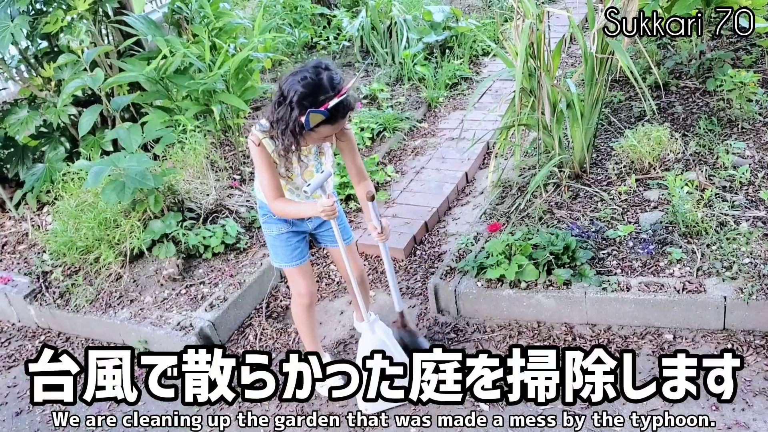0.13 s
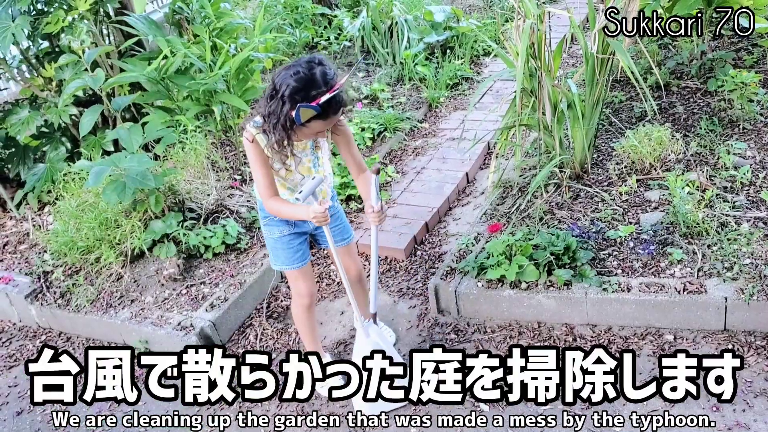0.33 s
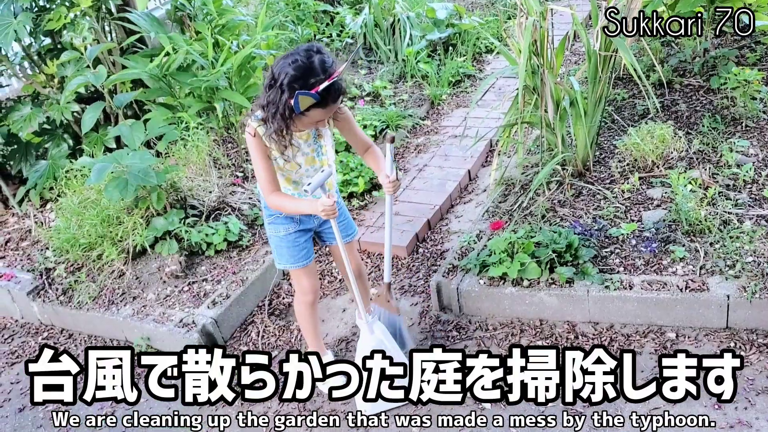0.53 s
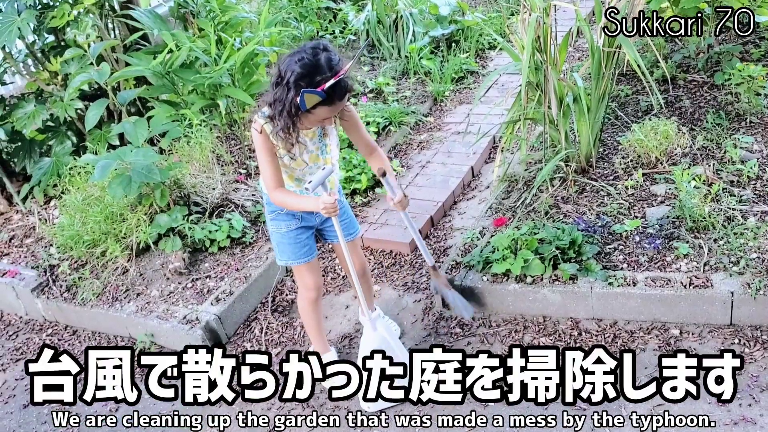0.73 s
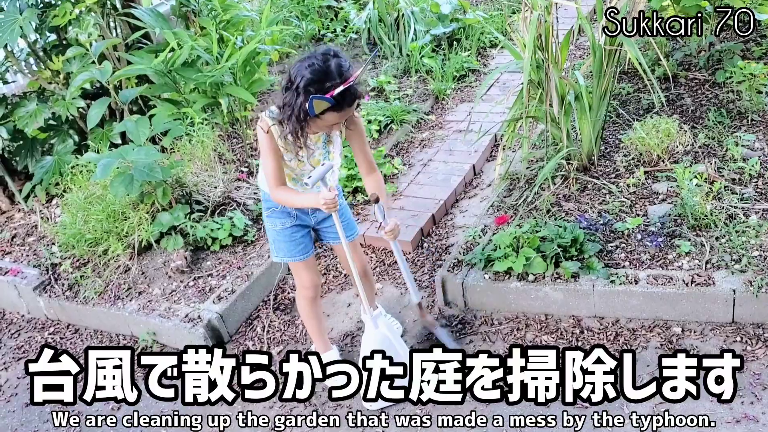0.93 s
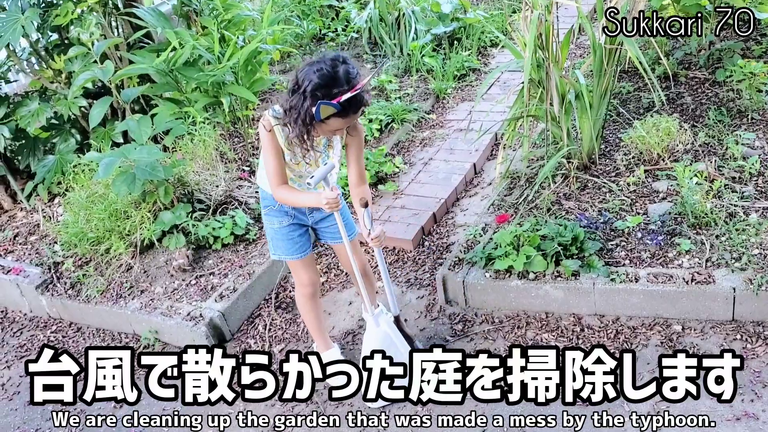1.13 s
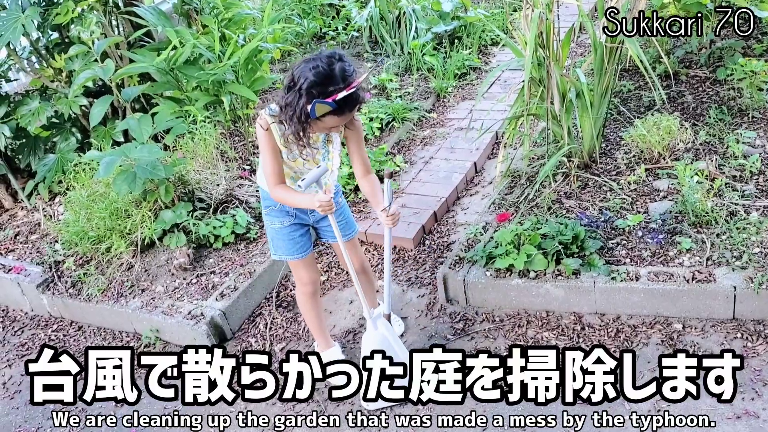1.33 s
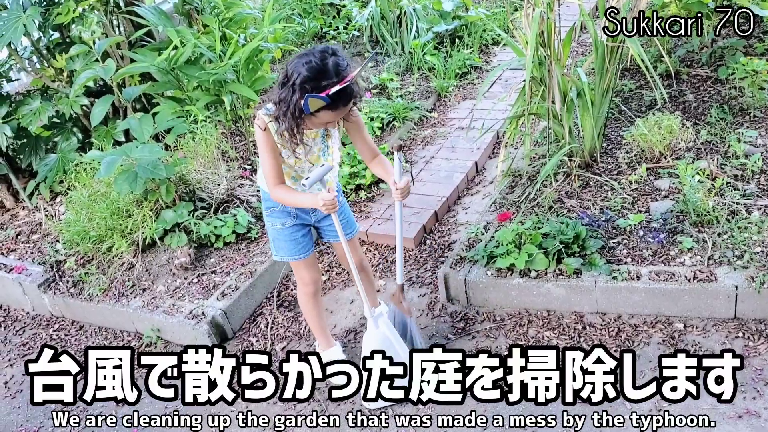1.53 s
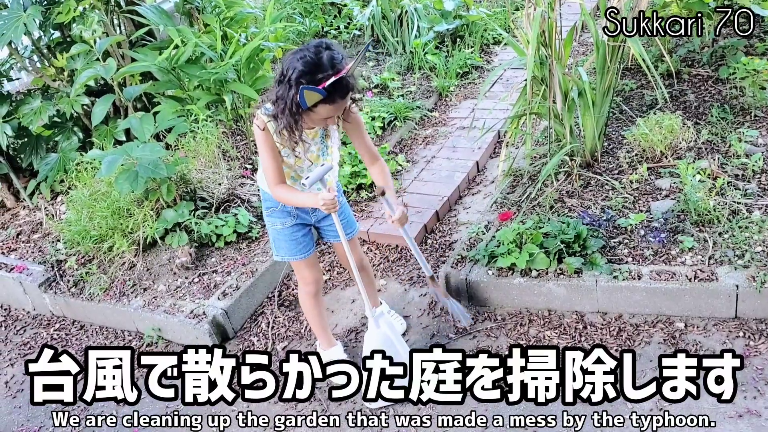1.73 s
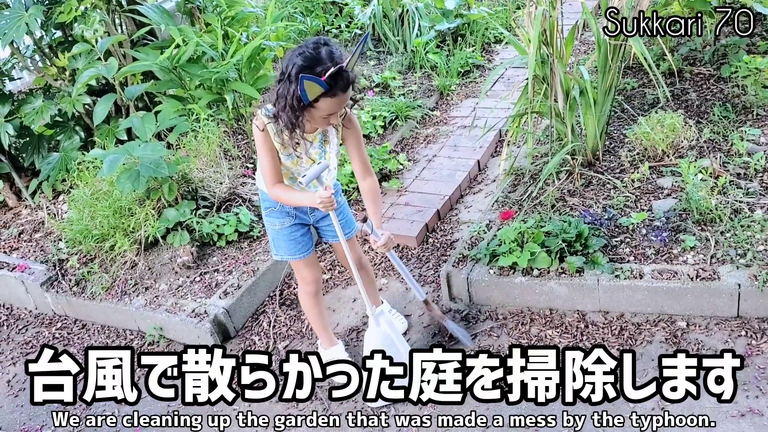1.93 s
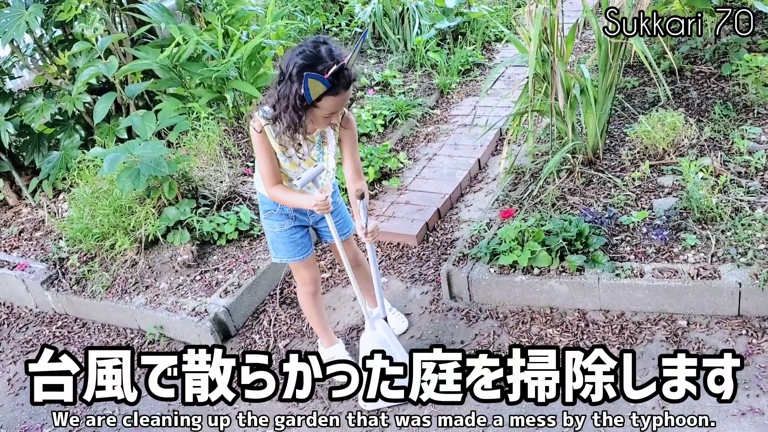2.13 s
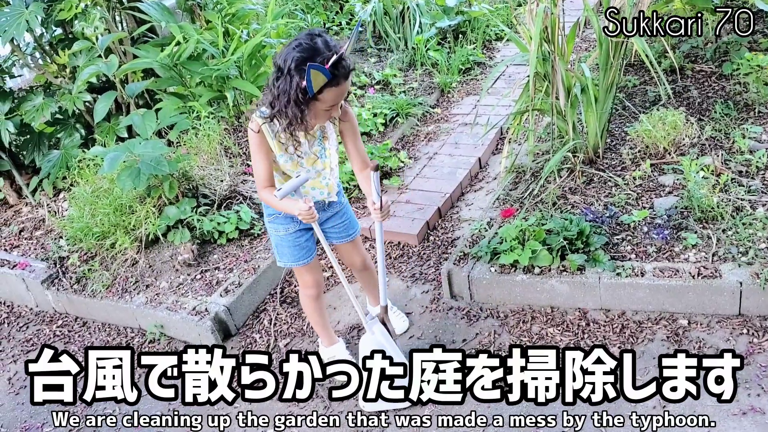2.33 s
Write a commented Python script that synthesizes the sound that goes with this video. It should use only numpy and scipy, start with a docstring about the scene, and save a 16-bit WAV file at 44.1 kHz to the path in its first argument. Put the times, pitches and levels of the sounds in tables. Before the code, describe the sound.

Close up in a garden, bristles scrape leaves and grit, then the broom head knocks a plastic pan; this happens three times, the last loudest, with light scuffs and grit clicks between and faint low rumble behind.

```python
"""A small broom sweeps dry leaves and grit over a dirt path into a hollow plastic dustpan, three strokes.
The bristles are hissing noise plus tiny crackling pings; light touches and clicks of grit come between.
Litter is noise that rushes onto the pan; knocks of the broom head are a crack plus ringing tones.
The walls answer faintly; under it all lie a soft rumble and the wavering hum of a distant machine."""
import sys
import numpy as np
from scipy import signal
from scipy.fft import rfft, irfft, next_fast_len
from scipy.io import wavfile
from scipy.ndimage import map_coordinates

SR = 44100
rng = np.random.default_rng(int(sys.argv[2]) if len(sys.argv) > 2 else 0)


def unload_wav(signal):
    """Save mono or channel-first audio to the path in sys.argv[1] as 16-bit WAV at rate SR, clipped to [-1, 1]."""
    wavfile.write(
        sys.argv[1],
        SR,
        np.round(np.clip(np.atleast_2d(signal).T, -1, 1) * 32767).astype(np.int16),
    )


N = 105531  # length in samples
TOP_HZ = 15750  # nothing sounds above this


def amp(db):
    """Turn decibels into gain."""
    return 10 ** (np.asarray(db) / 20)


def unit(x):
    """Scale x to an rms (average strength) of 1."""
    return x / np.sqrt(np.mean(x ** 2) + 1e-20)


def along(points, hz):
    """Read a curve of (Hz, value) points at hz, on a log frequency axis."""
    point_hz, values = np.transpose(points)
    return np.interp(np.log(hz + 1), np.log(point_hz + 1), values)


def since(s):
    """Seconds since time s, zero before it."""
    return np.maximum(np.arange(N) / SR - s, 0)


def fade(t, t60):
    """Gain that falls 60 dB in t60."""
    return np.exp(-np.log(1000) * t / t60)


def wobble(rate):
    """A smooth random curve with rate knots a second."""
    knots = rng.standard_normal(N // 20)
    return map_coordinates(knots, [np.arange(N) * rate / SR], mode="wrap")


def filtered(x, response):
    """Filter x by a response given as a function of frequency."""
    size = next_fast_len(N + SR // 2)
    hz = np.fft.rfftfreq(size, 1 / SR)
    return irfft(rfft(x, size) * response(hz), size)[..., :N]


def noise(spectrum, alike, grain_db=0):
    """Stereo noise of rms 1; grain_db scatters the sizes of its tiny contacts."""
    pair = rng.standard_normal((2, N)) * amp(grain_db * wobble(1500))

    def color(hz):
        # The balance of mid and side sets how alike the two ears are.
        turn = np.arccos(np.clip(along(alike, hz), -1, 1)) / 2
        return amp(along(spectrum, hz)) * [np.cos(turn), np.sin(turn)]

    mid, side = filtered(pair, color)
    return unit(np.array([mid + side, mid - side]))


# Push of the broom, one list per stroke. Each row: time in seconds, hiss level in dB before a shared lift.
STROKES = [
    [(0.03, -55), (0.088, -44), (0.164, -34.5), (0.218, -36.5), (0.24, -32), (0.296, -32), (0.376, -46.5),
     (0.478, -53), (0.498, -66), (0.532, -65), (0.54, -61)],
    [(0.955, -73), (0.973, -31), (1.023, -28.5), (1.115, -38.5), (1.273, -29), (1.319, -40), (1.335, -34.5),
     (1.425, -50), (1.609, -55.5), (1.667, -87), (1.68, -47)],
    [(1.88, -66), (1.902, -45), (1.95, -34.5), (2.008, -27), (2.07, -32), (2.136, -25.5), (2.39, -58.5)],
]
# Tone color of the bristle hiss. Each row: frequency in Hz, level in dB.
BRISTLES = [(200, -46), (900, -27.5), (1600, -22.5), (2400, -13), (3900, -10.5), (4900, -14.5),
            (7600, -8.5), (8900, 0), (10000, -4), (11300, 1.5), (13200, -4.5), (15700, -6)]
# How alike the broom sounds in both ears. Each row: frequency in Hz, likeness (1 is identical).
BRISTLE_ALIKE = [(500, .4), (3000, 0.4), (12000, 0.083)]
BRISTLE_LEAD_S = 0.000288  # the left ear hears the bristles this much earlier
CRACKLE_DB = -13.5  # crackle against hiss


def bristles():
    """Countless bristle tips flick over dirt and leaves; hiss and crackle follow the push of each stroke."""
    t = np.arange(N) / SR
    push = np.zeros(N)
    for stroke in STROKES:
        s, db = np.transpose(stroke)
        outside = np.maximum(s[0] - t, 0) + since(s[-1])  # seconds before or after the stroke
        push += amp(np.interp(t, s, db)) * fade(outside, 0.19)
    texture = noise(BRISTLES, BRISTLE_ALIKE, grain_db=1.4) + amp(CRACKLE_DB) * crackle()
    hiss = push * amp(3.0 + 0.64 * wobble(70)) * texture  # 3 dB lift and a small flutter
    ears = np.array([[1], [-1]])
    return filtered(hiss, lambda hz: np.exp(1j * np.pi * hz * BRISTLE_LEAD_S * ears))


CRACKLES_PER_S = 3000
CRACKLE_HZ, CRACKLE_OCTAVES = 8270, 2.17  # middle pitch, full spread before the cap at TOP_HZ
CRACKLE_CYCLES, CRACKLE_RANGE_DB = 7.4, 16.5  # cycles to fall 60 dB, loudest to softest


def crackle():
    """Dry leaf edges snap: tiny pings of random pitch and size, rms 1."""
    when, pitch, size, side = rng.uniform(size=(int(CRACKLES_PER_S * N / SR), 4)).T
    hz = np.minimum(CRACKLE_HZ * 2 ** (CRACKLE_OCTAVES * (pitch - .5)), TOP_HZ)[:, None]
    k = np.arange(96)  # samples in each ping
    cycles = hz * k / SR
    levels = amp(-CRACKLE_RANGE_DB * np.sqrt(size))[:, None]
    pings = levels * np.sin(2 * np.pi * cycles) * fade(cycles, CRACKLE_CYCLES)
    at = ((when * N).astype(int)[:, None] + k).ravel()
    ears = []
    for gain in (np.cos(np.pi * side), np.sin(np.pi * side)):
        ears.append(np.bincount(at, (pings * gain[:, None]).ravel(), N)[:N])
    return unit(np.array(ears))


# Light touches of the broom. Each row: start in seconds, length in seconds before it dies away,
# level of the bristles on dirt in dB, level of the leaves in dB.
TOUCHES = [(0.519, 0.036, -78, -55.5), (0.624, .02, -56, -57), (0.775, 0.025, -36, -46.5),
           (0.799, .04, -39.5, -41.5), (0.859, 0.0095, -41, -66), (0.896, 0.091, -51, -55),
           (1.482, 0.18, -68, -56), (1.676, 0.014, -63, -70), (1.728, 0.009, -45, -78),
           (1.814, 0.048, -49.5, -47.5)]
# Tone color of bristles on dirt. Each row: frequency in Hz, level in dB.
DIRT = [(200, -34), (2000, -30.5), (4200, -10), (6000, -11.5), (7500, -6), (9000, 0.5), (11500, 0),
        (13000, -5), (16000, -4)]
# Tone color of the leaves. Each row: frequency in Hz, level in dB.
LEAVES = [(200, -27), (700, -15), (1200, -2), (1650, -6.5), (2600, -1.5), (4200, -3), (6300, -5.5),
          (7500, -12), (16000, -29)]
TOUCH_RISE_S, TOUCH_T60_S = 0.033, 0.16  # time to come within a thousandth of full, 60 dB fall


def touches():
    """Short scuffs over dirt and leaves as the broom is lifted and set down."""
    out = np.zeros((2, N))
    dirt = noise(DIRT, BRISTLE_ALIKE, grain_db=2.5)
    leaves = noise(LEAVES, BRISTLE_ALIKE, grain_db=3)
    for s, length, dirt_db, leaves_db in TOUCHES:
        shape = (1 - fade(since(s), TOUCH_RISE_S)) * fade(since(s + length), TOUCH_T60_S)
        out += shape * (amp(dirt_db) * dirt + amp(leaves_db) * leaves)
    return out


# Single bits of grit flicked by the bristles. Each row: start in seconds, level in dB.
TICKS = [(.543, -43), (.548, -52), (.631, -41.5), (.636, -45.5), (0.874, -38), (1.729, -37.5), (1.733, -39),
         (2.237, -32)]
# Tone color of a grit click. Each row: frequency in Hz, level in dB.
GRIT = [(500, -16), (2500, -17), (5000, -8), (7500, -4), (9000, 6), (12000, 9), (13500, -2), (16000, -8)]
TICK_T60_S = 0.036  # 60 dB fall


def ticks():
    """Tiny stones click on the path: noise that starts at once and dies fast."""
    out = np.zeros((2, N))
    for s, db in TICKS:
        shape = (since(s) > 0) * fade(since(s), TICK_T60_S)
        out += amp(db) * shape * noise(GRIT, BRISTLE_ALIKE, grain_db=0.5)
    return out


# Litter sliding onto the pan. Each row: time it reaches the lip in seconds, time of the peak in seconds,
# peak level in dB, how much lower it is at the lip in dB, time to fall 60 dB in seconds.
SLIDES = [(0.229, .295, -33.5, 4.5, .5), (1.159, 1.266, -30.5, 18.5, 0.5459),
          (2.097, 2.145, -28, 10.5, 0.61)]
# Tone color of the sliding litter. Each row: frequency in Hz, level in dB.
LITTER = [(150, 0.5), (280, 3), (450, -3), (560, 0), (850, -7.5), (1180, 5.5), (1450, -1.5), (2400, 0),
          (4000, -1), (5000, -8), (9000, -7.5), (16000, -32)]
# How alike the pan sounds in both ears. Each row: frequency in Hz, likeness (1 is identical).
PAN_ALIKE = [(300, .97), (600, 0.3), (1200, 0), (4000, .25), (9000, 0.31)]
LIP_RISE_S = 0.002  # time constant of the onset


def litter():
    """Leaves and grit hit the lip of the pan, rush over its floor and settle."""
    t = np.arange(N) / SR
    flow = np.zeros(N)
    for lip, peak, db, lower_db, fall in SLIDES:
        onset = 1 - np.exp(-since(lip) / LIP_RISE_S)
        rush = amp(np.interp(t, [lip, peak], [db - lower_db, db]))
        flow += onset * rush * fade(since(peak), fall)
    return flow * amp(1.15 * wobble(90)) * noise(LITTER, PAN_ALIKE, grain_db=2)


# Broom head against the pan. Each row: start in seconds, level of the ring in dB,
# extra level of the lowest tones in dB, level of the crack in dB.
KNOCKS = [(0.2829, -14, -2.5, -16.5), (0.3671, -35.5, 5.5, -49), (.6030, -49, 5, -43),
          (1.2500, -15, -3, -14.5), (1.278, -25, -9, -34), (2.1240, -6.5, 1, -8), (2.1850, -12, -4, -18),
          (2.243, -30.5, 6, -47.5), (2.288, -31, 2.5, -43)]
# Tones the pan rings at. Each row: frequency in Hz, level in dB against the ring, time to fall 60 dB in seconds.
PAN = [(260, -23.5, 0.068), (280.2, 0.5, 0.1), (344.5, -10, 0.15), (409.6, -7.5, 0.084), (522.4, -4, .16),
       (539, -4, 0.09), (615.2, 0.5, 0.11), (660.5, 1, 0.062), (695.8, -9.5, 0.11), (735, -8.5, 0.11),
       (876, -9, 0.085), (1097, -8, .07), (1135, -4.5, 0.092), (1548, -19.5, 0.2), (1742, -19.5, 0.13),
       (2060, -7, 0.051), (2483, -11, 0.075), (3170, -5.5, 0.037), (3920, -22, 0.033), (4170, -18, 0.061)]
# Tone color of the crack. Each row: frequency in Hz, level in dB.
CRACK = [(100, -41), (190, -21), (260, -13), (450, -13), (650, -0.5), (1150, 3), (1350, -4), (2300, -2.5),
         (3800, -3.5), (5000, -12.5), (9000, -20.5), (16000, -38)]
CRACK_T60_S, CRACK_RISE_S = 0.067, 0.00017  # 60 dB fall, time constant of the onset
LOW_MODE_HZ, SWELL_S = 450, 0.0018  # upper edge of the lowest tones, time constant of the ring's build-up
MODE_SCATTER_DB, PHASE_SCATTER = 0.5, 0.91  # random spread per tone and blow: dB, radians
MODE_SPREAD = 0.41  # radians between the ears at 600 Hz


def knocks():
    """Each blow cracks on the plastic and sets the hollow pan ringing."""
    out = np.zeros((2, N))
    for s, ring_db, low_db, crack_db in KNOCKS:
        t = since(s)
        crack = (1 - np.exp(-t / CRACK_RISE_S)) * fade(t, CRACK_T60_S)
        out += amp(crack_db) * crack * noise(CRACK, PAN_ALIKE, grain_db=6)
        start = int(s * SR)
        t = t[start:start + SR // 3]
        scatter = rng.standard_normal((len(PAN), 2))
        for (hz, db, t60), (size, phase) in zip(PAN, scatter):
            level = amp(ring_db + db + low_db * (hz < LOW_MODE_HZ) + MODE_SCATTER_DB * size)
            # The ears differ more in phase at higher pitch, up to a quarter turn, either way round.
            apart = np.sign(phase) * min(MODE_SPREAD * hz / 600, np.pi / 2)
            ears = apart * np.array([[.5], [-.5]])
            tone = np.sin(2 * np.pi * hz * t + PHASE_SCATTER * phase + ears)
            shape = (1 - np.exp(-t / SWELL_S)) * fade(t, t60)
            out[:, start:start + len(t)] += level * shape * tone
    return out


# How long the walls' answer lasts. Each row: frequency in Hz, time to fall 60 dB in seconds.
WALLS_T60 = [(200, 0.62), (1000, 0.26), (4000, 0.28), (14000, 0.28)]
WALLS_DB, WALLS_DELAY_S = -11, .021


def walls(x):
    """A faint answer from the walls around the garden: x smeared by a delayed, dying noise tail."""
    hz, t, z = signal.stft(rng.standard_normal((2, SR // 2)), SR, nperseg=256)
    turn = np.arccos(np.clip(along(PAN_ALIKE, hz), -1, 1))[:, None] / 2
    dying = z * fade(t, along(WALLS_T60, hz)[:, None])
    mid, side = signal.istft(dying * np.array([np.cos(turn), np.sin(turn)]), SR, nperseg=256)[1]
    tail = np.array([mid + side, mid - side])
    tail = tail / np.linalg.norm(tail[0])
    late = np.pad(x, ((0, 0), (int(WALLS_DELAY_S * SR), 0)))
    return amp(WALLS_DB) * signal.fftconvolve(late, tail, axes=1)[:, :N]


# Tone color of the outdoor rumble. Each row: frequency in Hz, level in dB.
GARDEN = [(20, -27), (32, -20), (44, 5.5), (60, -9.5), (90, -5.5), (130, -3), (200, -10.5), (350, -7),
          (550, -17), (800, -18), (1300, -25), (3000, -29), (7000, -32.5), (11000, -27), (16000, -31)]
# How alike the rumble is in both ears. Each row: frequency in Hz, likeness (1 is identical).
GARDEN_ALIKE = [(100, 0.95), (350, 0.81), (800, 0), (2000, 0), (8000, 0)]
# Tones of the distant machine. Each row: frequency in Hz, distance in Hz to half height on either side,
# level in dB before the slow drift.
HUM = [(86, 8.2, -48), (244.6, 4.6, -58), (354.4, 2.4, -64), (766, 5.3, -65.5), (811, 2.2, -65.5)]
# Slow drift of the whole background. Each row: time in seconds, change in dB.
BACKGROUND_DRIFT = [(0, -3.5), (.45, -1), (.72, -3), (1.25, 3.5), (1.72, 0), (2.1, 3.5), (2.39, 3)]
GARDEN_DB = -46  # rumble before the drift


def garden():
    """Soft outdoor rumble and the wavering hum of a distant machine, made of narrow bands of noise."""
    hum = np.zeros(N)
    for centre, width, db in HUM:
        band = filtered(rng.standard_normal(N), lambda hz: 1 / (1 + ((hz - centre) / width) ** 2))
        hum += amp(db) * unit(band)
    rumble = amp(GARDEN_DB) * noise(GARDEN, GARDEN_ALIKE)
    drift_db = np.interp(np.arange(N) / SR, *np.transpose(BACKGROUND_DRIFT))
    return amp(drift_db) * (rumble + hum)


# Left-right balance of the near sounds. Each row: frequency in Hz, left minus right in dB.
BALANCE_DB = [(100, 0), (300, 0), (650, -3.5), (1200, 2), (2000, -3.5), (3300, -2.5), (5500, 5),
              (9000, -1.5), (15000, -1.5)]
GROUND_DELAY_S, GROUND_DB = 0.0016, -18  # bounce off the path


def scene():
    """Broom and pan in the garden; the broom's sounds also bounce once off the path."""
    broom = bristles() + touches() + ticks()
    broom = filtered(broom, lambda hz: 1 + amp(GROUND_DB) * np.exp(-2j * np.pi * hz * GROUND_DELAY_S))
    pan = litter() + knocks()
    near = broom + pan + walls(pan)
    ears = np.array([[.5], [-.5]])
    return filtered(near, lambda hz: amp(along(BALANCE_DB, hz) * ears)) + garden()


LOW_CUT_HZ = 32  # half amplitude here, less below


def record(dry):
    """Peaks beyond full scale are clipped; the deepest bass and all from TOP_HZ up are cut."""
    clipped = np.clip(dry, -1, 1)
    return filtered(clipped, lambda hz: (hz < TOP_HZ) * hz ** 4 / (hz ** 4 + LOW_CUT_HZ ** 4))


dry = scene()
out = record(dry)
unload_wav(out)
```